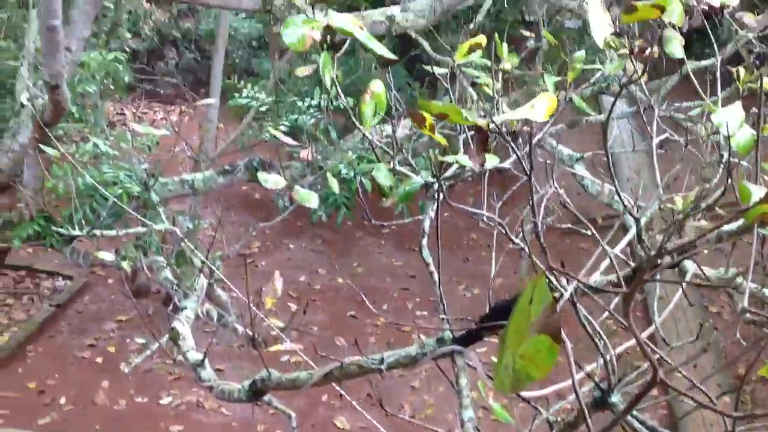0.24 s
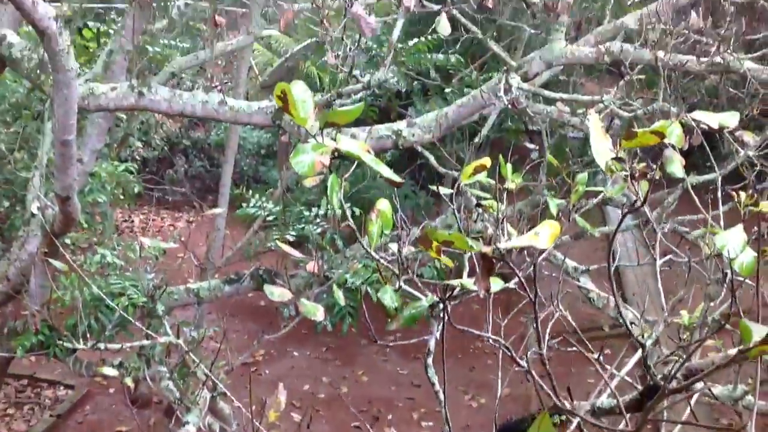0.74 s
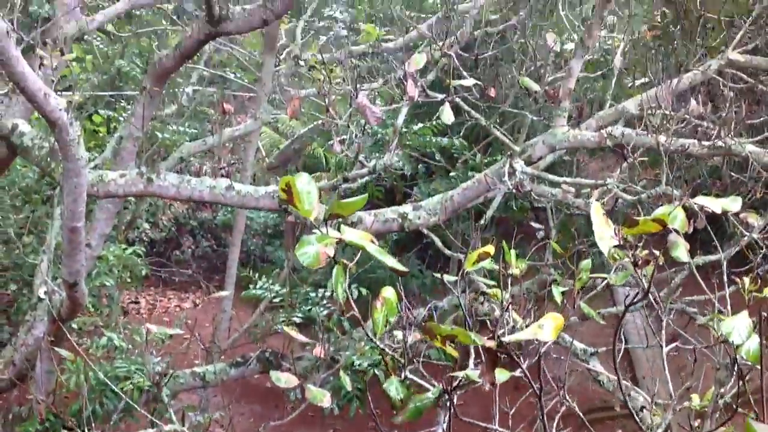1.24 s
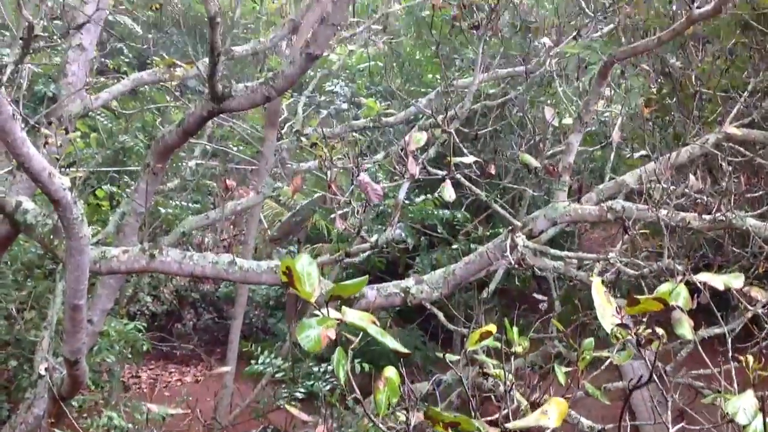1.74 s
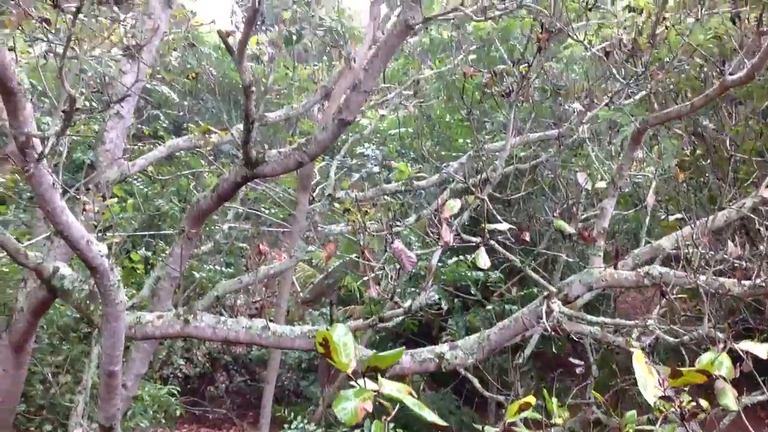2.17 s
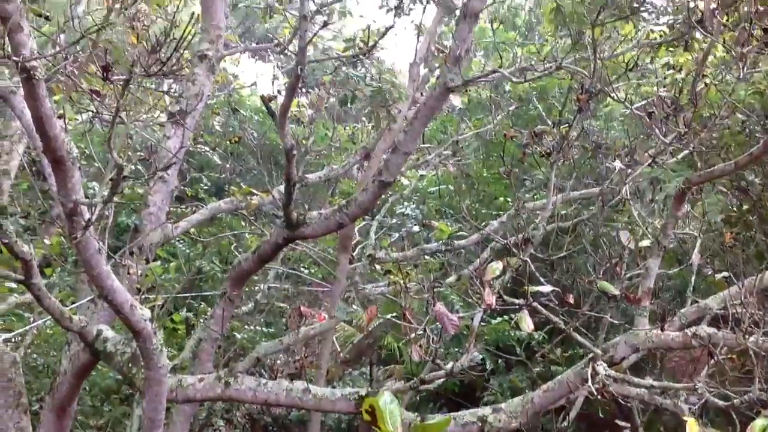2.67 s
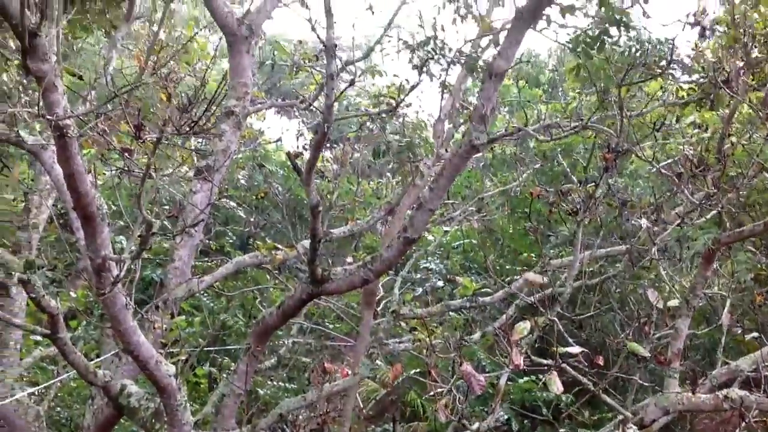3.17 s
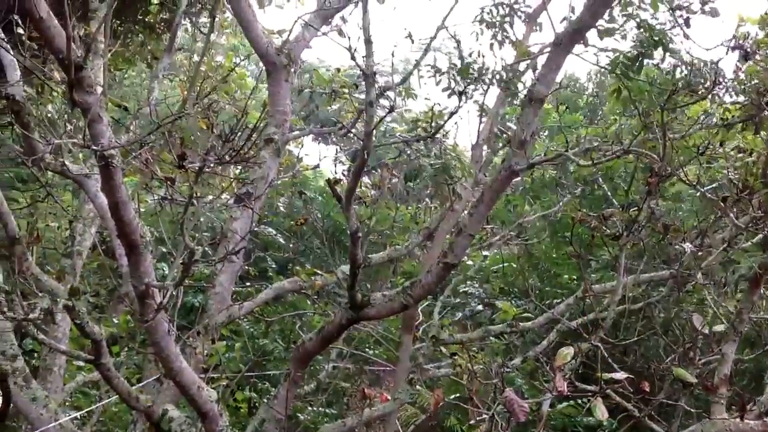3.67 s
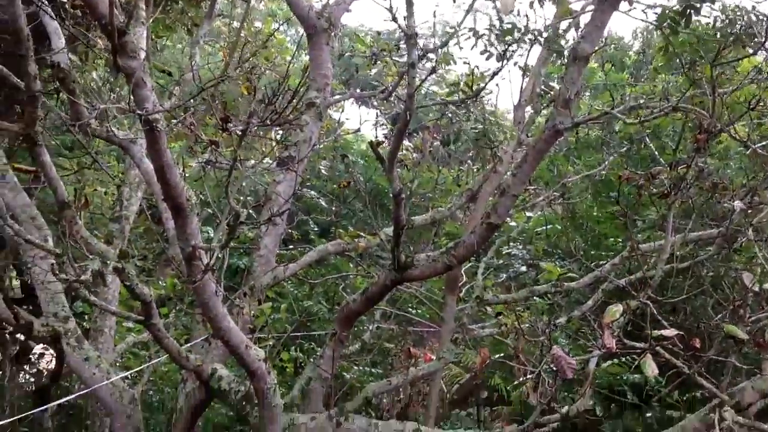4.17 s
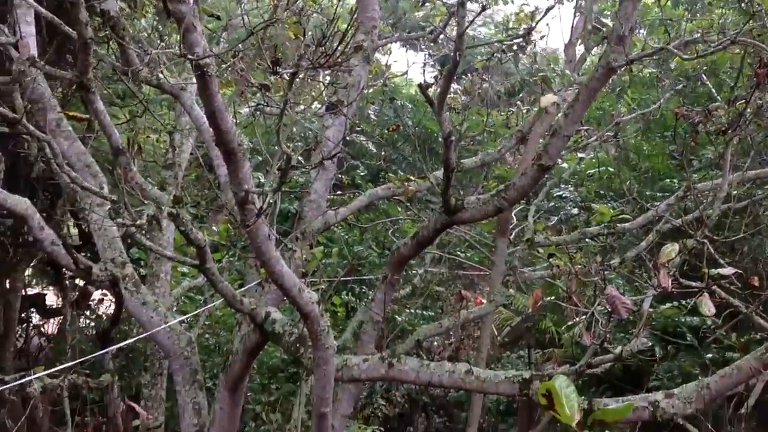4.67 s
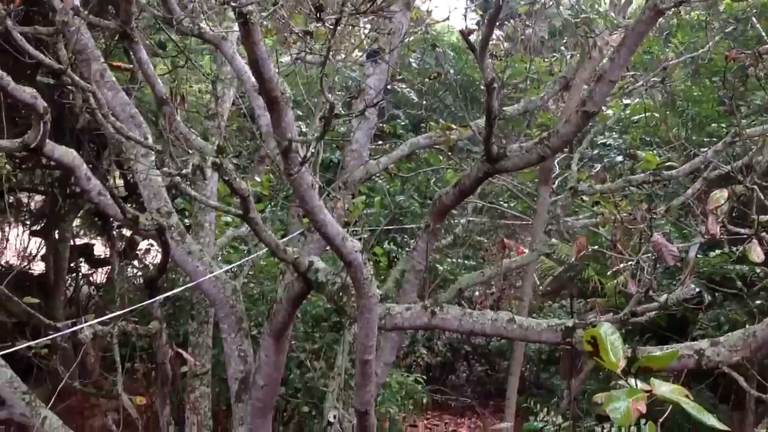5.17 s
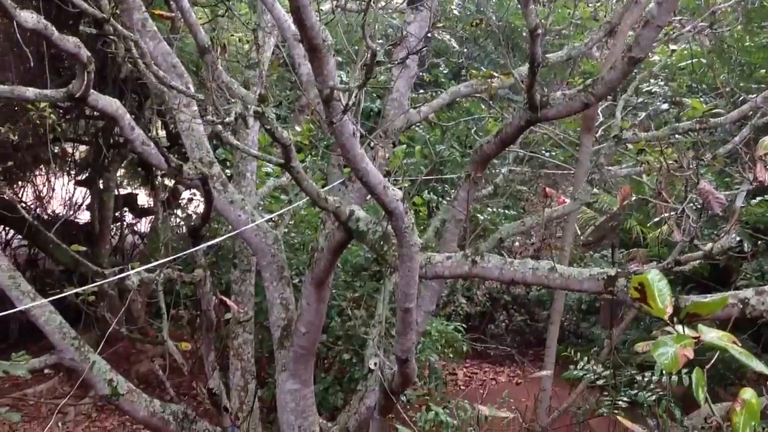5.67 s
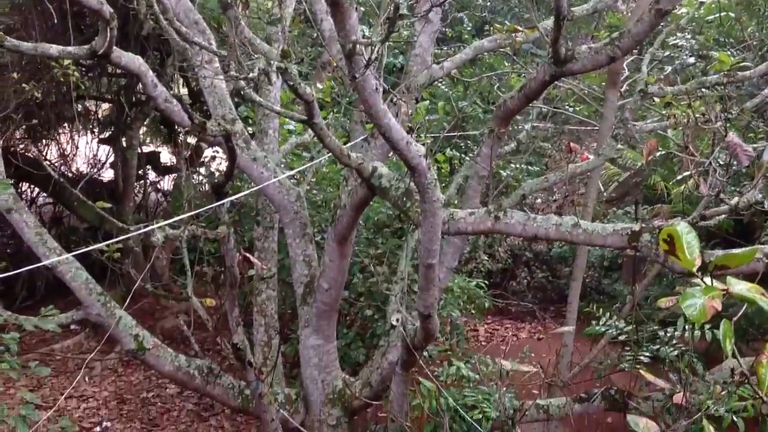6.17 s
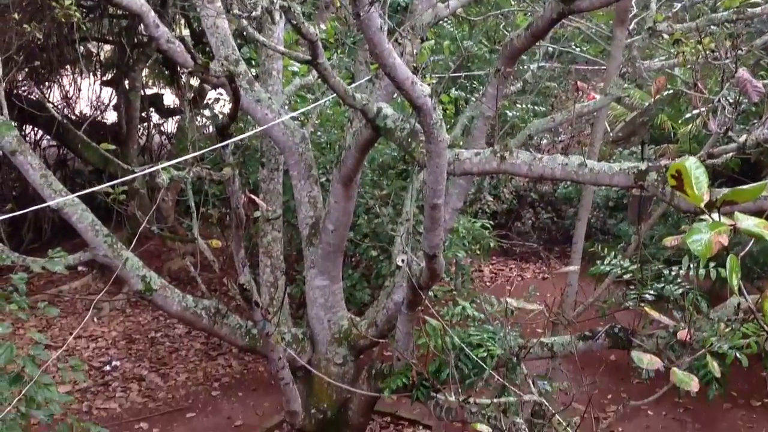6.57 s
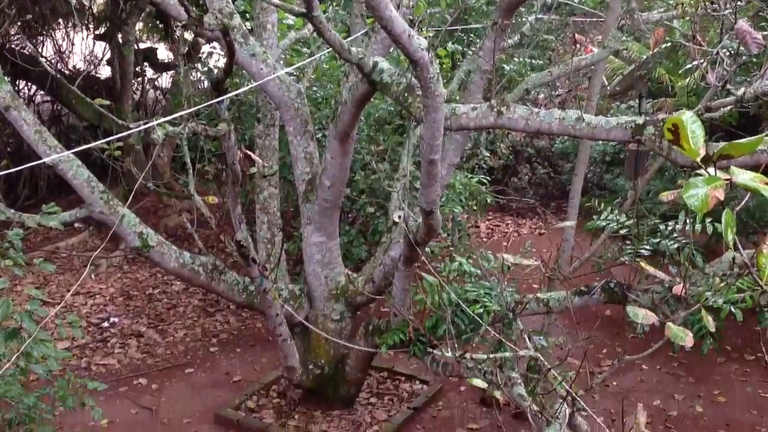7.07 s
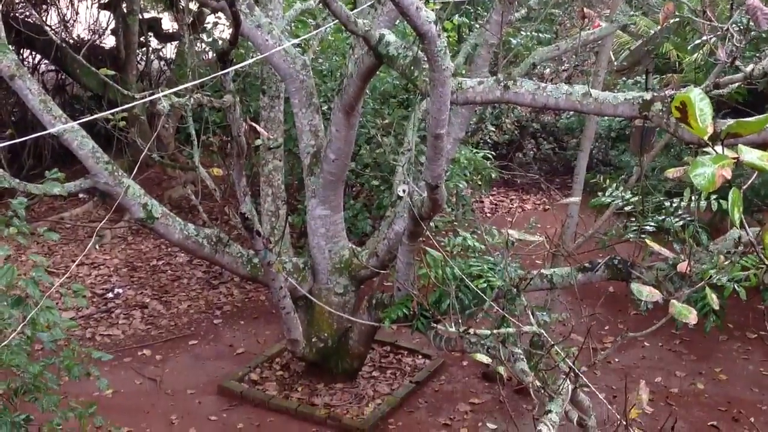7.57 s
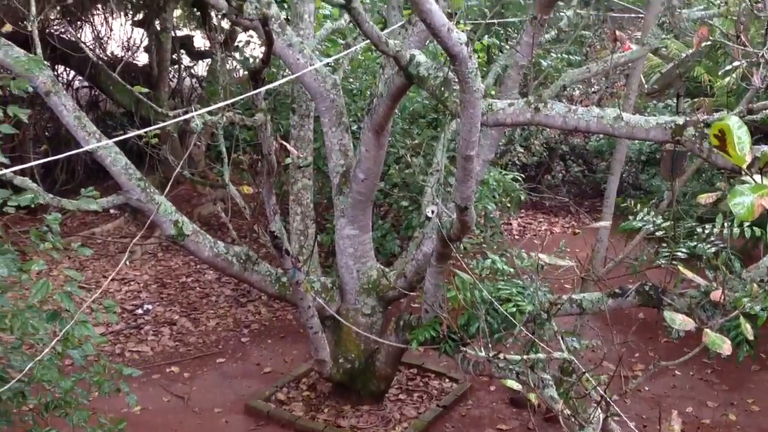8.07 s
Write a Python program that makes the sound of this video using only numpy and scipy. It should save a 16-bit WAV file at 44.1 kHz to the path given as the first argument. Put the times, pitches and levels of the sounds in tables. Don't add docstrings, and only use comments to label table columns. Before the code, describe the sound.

An even, moderate rain hiss fills the whole stretch, made of countless small drops on foliage. Over it, irregular dry ticks, duller leaf slaps and faint short drips stand out close to the microphone. Branches shed brief clumps of drops, so the patter flutters gently. The place is a leafy garden; the sound is centred, treble-rich, slightly grainy, and gradually a little quieter.

```python
import sys
import numpy as np
from scipy import signal
from scipy.fft import rfft, irfft, next_fast_len
from scipy.io import wavfile
from scipy.ndimage import uniform_filter1d, map_coordinates

SR = 44100
rng = np.random.default_rng(int(sys.argv[2]) if len(sys.argv) > 2 else 0)


def volts_from_db(level):
    exponent = np.asarray(level, float) / 20
    return 10 ** exponent


def put_to_file(sound):
    columns = np.atleast_2d(sound).T
    safe = np.clip(columns, -1, 1)
    whole_steps = np.round(safe * 32767)
    wavfile.write(sys.argv[1], SR, whole_steps.astype(np.int16))


N = 367353

# time_s, strength_db, brightness_db
RAIN = [(0.0, -33.5, -0.5), (0.32, -31, -0.5), (1.39, -32, 0.5), (1.51, -32, 1), (2.97, -33.5, 0.5),
        (3.78, -33, 0), (4.38, -34, 0), (5.01, -34, 0), (5.84, -35.5, -0.5), (7.03, -35.5, -0.5),
        (8.33, -37.5, 0)]
# frequency_hz, density_db (per Hz)
SOIL_SPECTRUM = [(15, -70), (25, -50), (50, -45), (130, -11), (190, -2.5), (430, -1.5), (650, 0.5),
                 (1000, -1), (2000, -4), (4000, -40)]
# frequency_hz, density_db (per Hz)
LEAF_SPECTRUM = [(200, -71), (500, -15.5), (900, -10), (1500, -5), (2300, -2.5), (3000, -3), (4000, -4.5),
                 (6000, -11), (10000, -27)]
# frequency_hz, density_db (per Hz)
SPRAY_SPECTRUM = [(1000, -50), (2500, -3), (4000, -2), (5500, 1), (8000, 2), (10500, 1), (12000, 1.5)]
# centre_s, swell_db, length_s
FLURRIES = [(0.065, 1, .08), (.27, 0.5, .13), (.46, 0, .16), (.93, 0.2, 0.11), (1.12, .5, .08),
            (1.39, 1, 0.1), (1.635, 1.1, 0.2), (1.885, 0.8, .1), (2.19, 1, 0.15), (2.57, 1, 0.28),
            (3.207, 0.5, 0.12), (3.44, .5, .1), (3.62, 0.8, .1), (3.83, .9, 0.13), (4.13, 0.7, .12),
            (4.372, 0.7, 0.054), (4.692, 1, .08), (4.82, .9, 0.12), (5.18, 1.4, 0.1), (5.48, 1.1, 0.16),
            (5.923, 0.7, .08), (6.094, 1.5, 0.21), (6.483, 0.6, 0.1), (6.92, 0.5, 0.12),
            (7.187, 0.7, 0.082), (7.372, 1.5, 0.092), (7.57, 0.7, .16), (7.784, 1.3, 0.062),
            (8.06, 1.2, .08), (8.23, 1.5, .06)]
# start_s, level_db
SLAPS = [(0.05, -27), (0.257, -25), (0.329, -26), (.7681, -31), (.908, -25.5), (0.933, -30), (0.957, -29),
         (1.266, -29), (1.37, -33), (1.616, -29), (1.718, -42), (1.8783, -31), (2.2847, -26), (3.2125, -25),
         (3.733, -26), (3.8652, -24), (4.458, -33), (4.6824, -28), (4.8136, -30), (5.1523, -33),
         (5.196, -33), (5.9604, -29), (6.068, -31), (6.632, -32), (7.2074, -32), (7.335, -30),
         (7.3925, -30), (7.417, -37)]
# start_s, level_db, pitch_hz
CRACKS = [(.4689, -24, 10000), (.7681, -23, 11400), (1.1215, -23, 11700), (1.266, -22, 11400),
          (1.3041, -24, 12700), (1.3705, -26, 9700), (1.557, -25, 5900), (1.616, -25, 11700),
          (1.7462, -31, 6200), (1.8783, -25, 10000), (1.908, -31, 5900), (2.5903, -24, 13100),
          (2.6231, -24, 10300), (1.7946, -33, 9000), (3.614, -29, 10300), (3.733, -29, 12700),
          (4.2509, -25, 13100), (4.3674, -25, 10700), (4.4582, -24, 14100), (4.7917, -25, 11700),
          (5.19, -25, 8300), (5.3194, -27, 13800), (5.4966, -23, 14500), (6.012, -23, 10700),
          (6.6227, -23, 13000), (7.0638, -28, 7200), (7.335, -25, 9000), (8.0132, -27, 9000),
          (8.057, -25, 9600), (8.0746, -29, 8600)]
# start_s, pitch_hz
LESSER_CRACKS = [(.1194, 11000), (.384, 8600), (1.074, 12400), (1.114, 13400), (1.573, 8600), (2.512, 7600),
                 (3.1006, 10700), (3.123, 4800), (3.6635, 6900), (4.0615, 13400), (4.3102, 6500),
                 (4.4735, 9000), (5.042, 6500), (5.1441, 5200), (5.4814, 9300), (5.5196, 6900),
                 (5.895, 5500), (6.0504, 9000), (6.1584, 7600), (6.477, 9600), (6.519, 7900),
                 (6.6904, 9000), (6.8098, 8600), (7.303, 6900), (7.3843, 11400), (7.5922, 9600),
                 (7.6778, 8300), (7.8222, 6200), (7.9557, 5500), (8.2766, 12700)]
# start_s, low_edge_hz
OPPOSED_BANDS = [(.427, 4670), (.427, 6280), (.427, 7270), (1.147, 4210), (1.147, 6290), (1.147, 10320),
                 (1.518, 6890), (2.331, 13770), (2.865, 6300), (2.865, 11720), (3.26, 4640), (3.26, 6900),
                 (3.26, 12380), (3.562, 11050), (4.258, 4210), (4.258, 8980), (4.258, 13070),
                 (4.978, 10320), (5.28, 4220), (5.28, 11680), (6.395, 5160), (6.395, 13780), (6.929, 4690),
                 (6.929, 7630), (6.929, 8630), (6.929, 13160), (7.857, 5170), (7.857, 12400)]
# centre_s, level_db, pitch_hz
DRIPS = [(0.8011, -34, 2730), (1.0202, -40, 5600), (1.3482, -40, 2040), (1.9011, -39, 14380),
         (2.38, -37, 12320), (2.5629, -48, 9690), (3.655, -39, 1170), (4.3741, -33.5, 1670),
         (4.6904, -36, 3290), (4.7819, -40, 560), (5.1853, -43, 7540), (5.1853, -42, 14130),
         (5.1887, -40, 990), (5.2013, -43, 5350), (5.3928, -40, 1380), (5.4901, -39, 6500),
         (5.6308, -38.5, 1410), (5.6642, -39, 9090), (5.6671, -25, 15500), (5.9603, -50, 2840),
         (6.0125, -37, 3560), (6.0688, -43, 3230), (6.1852, -41, 724), (6.4334, -42, 12400),
         (6.9544, -41, 3160), (7.0095, -39, 15250), (7.0269, -45, 15290), (7.0356, -46, 9000)]

LEAF_DB, SPRAY_DB, SOIL_DB = -5.5, -1, -14
LEAF_SWELLS, SPRAY_SWELLS, SOIL_FOLLOWS = 1.3, .9, 0.62
SMALL_DB, SMALL_SPREAD_DB, SMALL_HZ = 0, 2, 9500
LESSER_DB = 5.5
SLAP_UNDER_DB, CRACK_UNDER_DB, DULL_HZ = -14, -10, 7000
BAND_DB, BAND_SHARE, WIDEST_HZ = -15.5, 0.22, 1380
FRAME, FRAME_OFFSET = 1024, 847
TOP_HZ = 15310


def unit(x):
    return x / np.sqrt(np.mean(x ** 2) + 1e-20)


def curves(rows):
    s, *cols = np.transpose(rows)
    return [np.interp(np.arange(N) / SR, s, c) for c in cols]


def filtered(x, response):
    m = next_fast_len(N + 8192)
    return irfft(rfft(x, m) * response(np.fft.rfftfreq(m, 1 / SR)), m)[..., :N]


def coloured(x, spectrum):
    f, level_db = np.transpose(spectrum)
    own_hz, own_power = signal.welch(x, SR, nperseg=256)

    def response(hz):
        wanted = volts_from_db(np.interp(np.log(hz + 1), np.log(f), level_db))
        return wanted / np.sqrt(np.interp(hz, own_hz, own_power))
    return unit(filtered(x, response))


def wash(patchy_db):
    z = signal.stft(rng.standard_normal(N), nperseg=512)[2]
    field = uniform_filter1d(rng.standard_normal(z.shape), size=8, axis=0)
    field = uniform_filter1d(field, size=8, axis=1)
    return signal.istft(z * volts_from_db(patchy_db * unit(field)), nperseg=512)[1][:N]


def strikes(s, db, hz, cycles, size):
    turns = np.arange(size) / SR * hz[:, None]
    peak = rng.choice([-1, 1], len(s)) * volts_from_db(db)
    shape = peak[:, None] * np.sin(2 * np.pi * turns) * np.exp(-turns / cycles)
    at = np.round(s * SR).astype(int)[:, None] + np.arange(size)
    return np.bincount(at.ravel(), shape.ravel(), N + size + SR)[:N]


def scattered(x, wet_db, t60, count=5):
    t = np.arange(SR // 10) / SR
    tails = rng.standard_normal((count, len(t))) * volts_from_db(-60 * t / t60) * (t > .001)
    tails = tails / np.linalg.norm(tails[0])
    choice = rng.integers(count, size=N // 512 + 1).repeat(512)[:N]
    turn = choice == np.arange(count)[:, None]
    return x + volts_from_db(wet_db) * signal.oaconvolve(x * turn, tails, axes=1).sum(0)[:N]


def drops(s, size_db, hz, octaves, cycles):
    pitch = np.clip(hz * 2 ** (octaves * rng.standard_normal(len(s))), 300, 15000)
    return unit(strikes(s, size_db, pitch, cycles, size=160))


def flurries():
    t = np.arange(0, N, 64) / SR
    swell = sum(db * np.exp(-np.log(16) * ((t - s) / length) ** 2) for s, db, length in FLURRIES)
    return swell.repeat(64)[:N]


def leaf_patter(s, size_db):
    patter = drops(s, size_db, hz=2680, octaves=0.51, cycles=0.92)
    near = scattered(patter, wet_db=-5.0, t60=0.058)
    return coloured(unit(wash(patchy_db=1.4)) + volts_from_db(-7.0) * near, LEAF_SPECTRUM)


def fine_spray(s, size_db):
    fizz = drops(s, size_db, hz=9000, octaves=0.53, cycles=0.98)
    near = scattered(fizz, wet_db=-2.5, t60=0.072)
    return coloured(unit(wash(patchy_db=-0.16)) + volts_from_db(-6.0) * near, SPRAY_SPECTRUM)


def rain(count=16000):
    strength_db, bright_db = curves(RAIN)
    swell_db = flurries()
    leaf_db = strength_db + LEAF_DB + LEAF_SWELLS * swell_db - bright_db / 2
    spray_db = strength_db + SPRAY_DB + SPRAY_SWELLS * swell_db + bright_db / 2
    mean_db = strength_db.mean()
    soil_db = mean_db + SOIL_DB + SOIL_FOLLOWS * (strength_db - mean_db)
    u, z = rng.random((count, 2)), rng.standard_normal((count, 2))
    s = u[:, 0] * N / SR
    size_db = -3 * np.log(u[:, 1])
    size_db += 0.6 * map_coordinates(rng.standard_normal(600), [s * 60])
    size_db += 0.9 * swell_db[(s * SR).astype(int)]
    slap_db, spit_db = np.minimum(size_db + 2 * z.T, 11)
    soil = coloured(wash(patchy_db=0.8), SOIL_SPECTRUM)
    leaf = leaf_patter(s, slap_db)
    spray = fine_spray(s, spit_db)
    return volts_from_db(soil_db) * soil + volts_from_db(leaf_db) * leaf + volts_from_db(spray_db) * spray


def small_cracks(count):
    listed_s, listed_hz = np.transpose(LESSER_CRACKS)
    listed = len(listed_s)
    u, z = rng.random(count) * (N - 1), rng.standard_normal((count, 2))
    at = np.hstack([listed_s * SR, u[listed:]])
    lift_db = SMALL_DB + LESSER_DB * (np.arange(count) < listed)
    db = curves(RAIN)[0][at.astype(int)] + lift_db + SMALL_SPREAD_DB * np.tanh(z[:, 0])
    random_hz = np.clip(SMALL_HZ * 2 ** (0.69 * z[listed:, 1]), 4800, 14800)
    return [at / SR, db, np.hstack([listed_hz, random_hz])]


def ticks(count=80):
    sharp_s, sharp_db, sharp_hz = np.hstack([np.transpose(CRACKS), small_cracks(count)])
    heavy_s, heavy_db = np.transpose(SLAPS)
    s = np.hstack([sharp_s, heavy_s])
    crack_db = np.hstack([sharp_db, heavy_db + CRACK_UNDER_DB])
    slap_db = np.hstack([sharp_db + SLAP_UNDER_DB, heavy_db])
    crack_hz = np.hstack([sharp_hz, DULL_HZ + 0 * heavy_s])
    slap_hz = 2800 * 2 ** (.2 * rng.standard_normal(len(s)))
    crack = strikes(s - .0002, crack_db + 11, crack_hz, 1.1, size=200)
    slap = strikes(s - .0002, slap_db + 7, slap_hz, 1.2, size=200)
    near = scattered(crack + slap, wet_db=-.5, t60=.045)
    return filtered(near, lambda f: f ** 4 / (f ** 4 + 700 ** 4))


def opposed_bands():
    out, n = np.zeros(N), np.arange(2 * FRAME) + .5
    strength_db = curves(RAIN)[0]
    for s, low_hz in OPPOSED_BANDS:
        high_hz = low_hz + min(BAND_SHARE * low_hz, WIDEST_HZ)
        db = strength_db[round(s * SR)] + BAND_DB
        lines = np.arange(round(low_hz * 2 * FRAME / SR), round(high_hz * 2 * FRAME / SR)) + .5
        cosines = np.cos(np.pi / FRAME * np.outer(lines, n + FRAME / 2))
        band = rng.standard_normal(len(lines)) @ cosines
        start = FRAME_OFFSET + FRAME * round(s * SR / FRAME - 1.39)
        out[start:][:2 * FRAME] += volts_from_db(db) * np.sin(np.pi * n / (2 * FRAME)) * unit(band)
    return out


def drips():
    out, t = np.zeros(N + SR), np.arange(-600, 600) / SR
    for s, db, hz in DRIPS:
        waver = .5 * map_coordinates(rng.standard_normal(12), [np.arange(len(t)) / 110])
        swell = np.exp(-np.abs(t / np.where(t < 0, .0055, .0065)) ** 3)
        ring = np.sin(2 * np.pi * min(hz, TOP_HZ - 40) * t + waver)
        out[round(s * SR) - 600:][:len(t)] += volts_from_db(db + 0.5) * swell * ring
    return out[:N] + volts_from_db(-16) * np.roll(out[:N], 750)


def dropouts(x, count, width_hz, length):
    hz, t, z = signal.stft(x, SR, nperseg=2048)
    for at, f, k in rng.random((count, 3)):
        in_band = abs(hz - 7000 - 8000 * f) < width_hz
        in_time = abs(t - at * N / SR) < length * (.4 + k)
        z[in_band[:, None] & in_time] *= volts_from_db(-30)
    return signal.istft(z, SR, nperseg=2048)[1][:N]


def scene():
    return np.tile(rain() + ticks() + drips(), (2, 1))


def band_limit(x):
    return signal.sosfilt(signal.butter(12, 15450, fs=SR, output="sos"), x)


def record(dry):
    thinned = dropouts(dry[0], count=520, width_hz=34, length=.035)
    kept = filtered(thinned, lambda hz: hz < TOP_HZ)
    mix = kept + [[1], [-1]] * opposed_bands()
    return band_limit(mix)


dry = scene()
out = record(dry)
put_to_file(out)
```